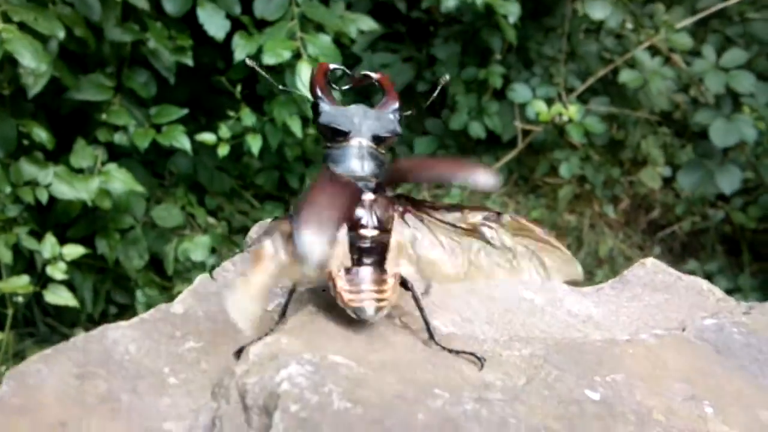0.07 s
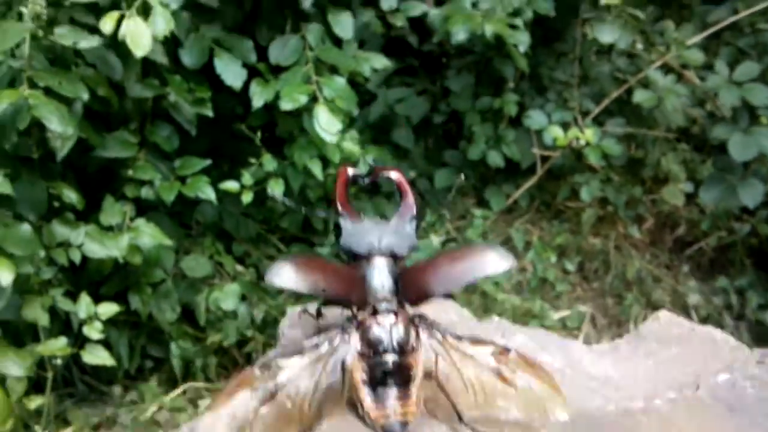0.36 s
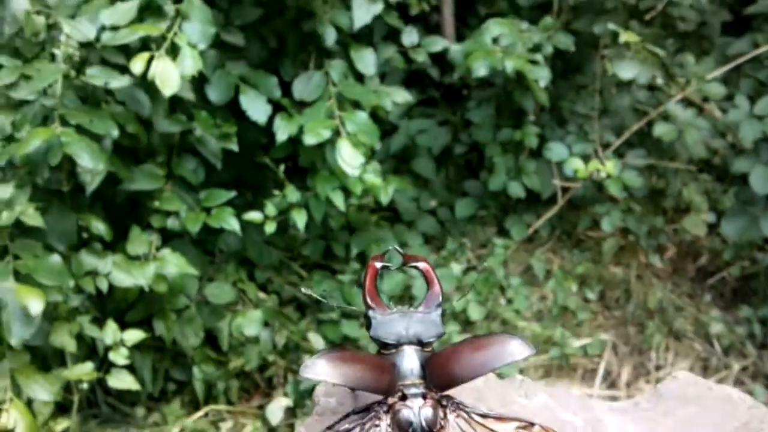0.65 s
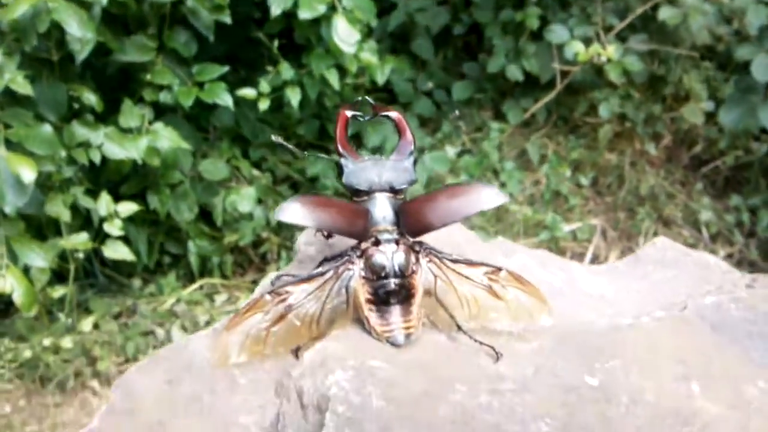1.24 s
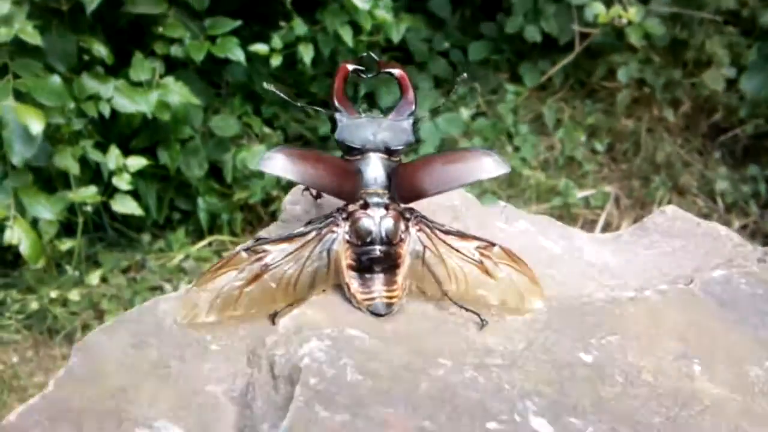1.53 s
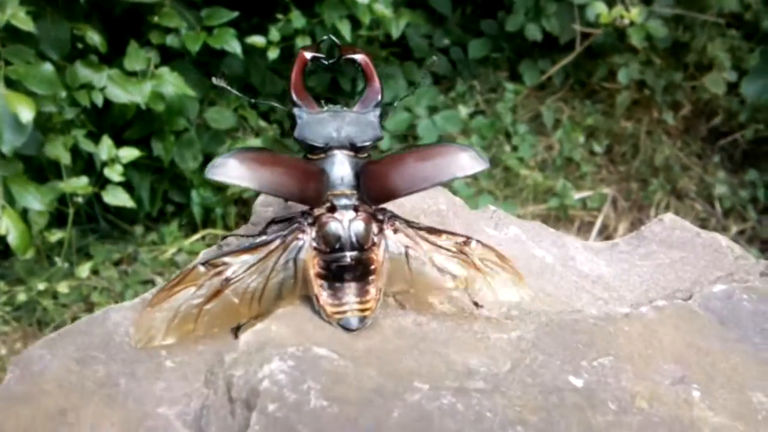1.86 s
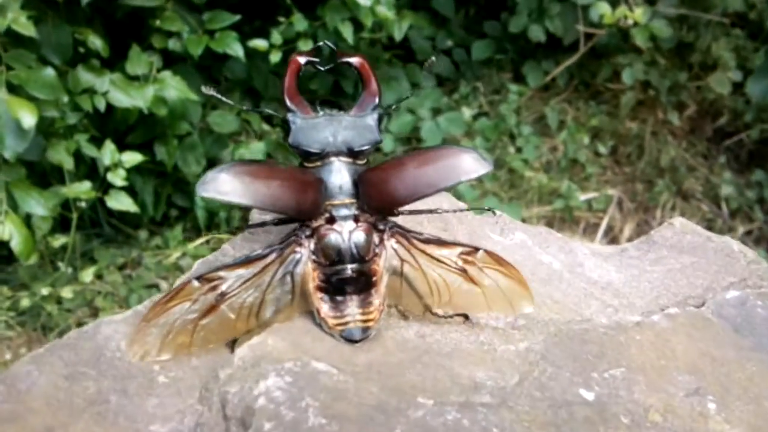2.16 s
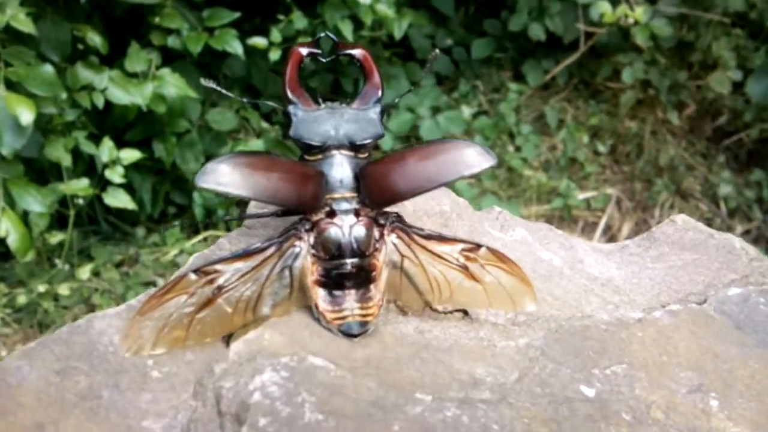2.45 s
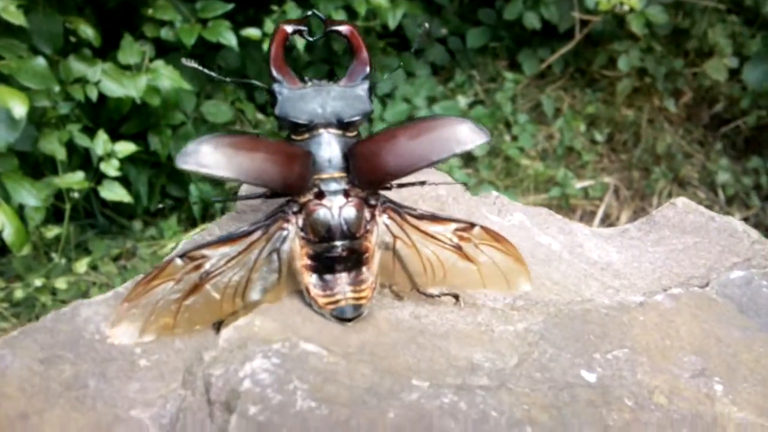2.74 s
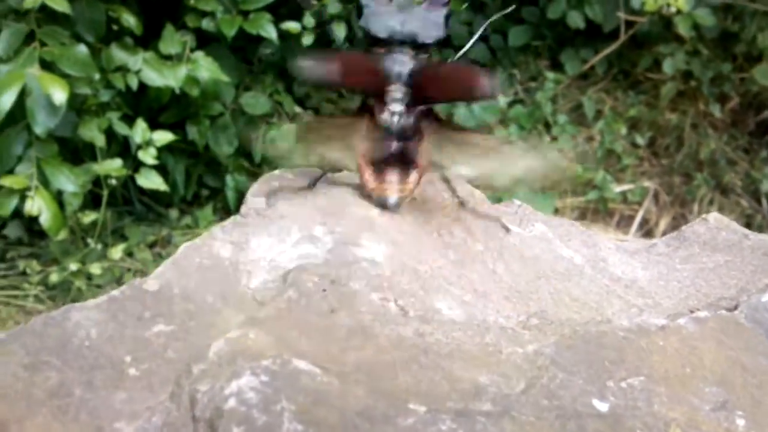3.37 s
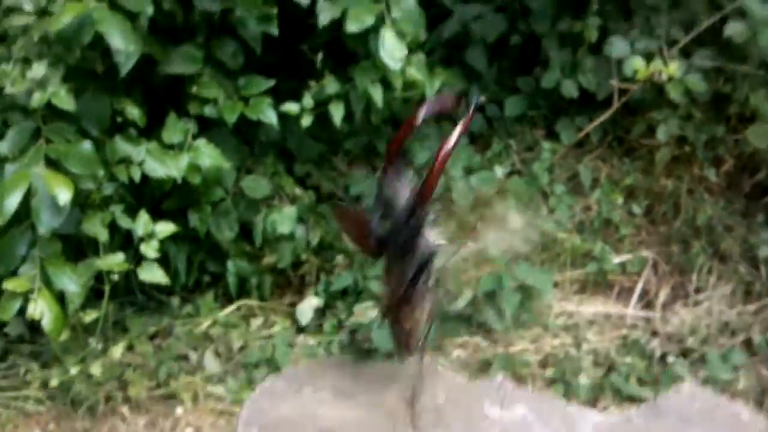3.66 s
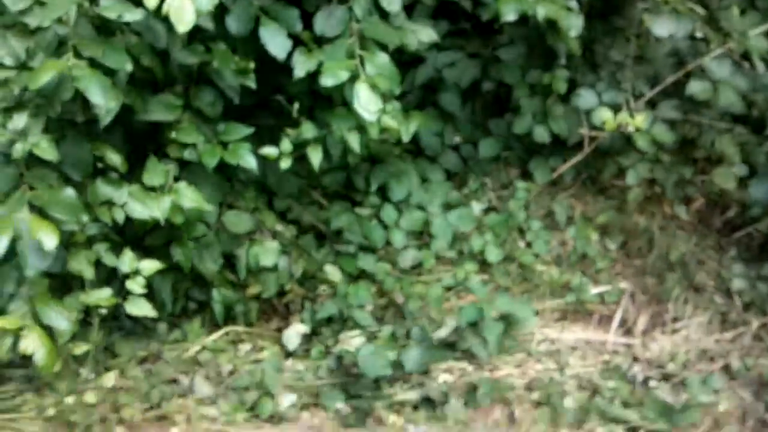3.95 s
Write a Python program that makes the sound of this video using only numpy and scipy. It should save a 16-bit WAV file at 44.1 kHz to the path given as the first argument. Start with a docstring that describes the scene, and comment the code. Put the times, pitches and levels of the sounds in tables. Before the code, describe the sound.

Low buzz and papery rattle of a beetle's wings, following quiet woodland with distant birds.

```python
"""A stag beetle takes off close by, its wings beating about 40 times a second.
Each stroke pushes air, giving a downwash and a hum; each reversal flicks the membrane.
The wings strike something as they start, and again as the beetle brushes past, with a papery rattle.
Before and behind the flight lies a quiet wood: a steady hush, distant birds and one soft knock."""
import sys
import numpy as np
from scipy import signal
from scipy.fft import rfft, irfft, next_fast_len
from scipy.io import wavfile
from scipy.ndimage import map_coordinates

SR = 44100
rng = np.random.default_rng(int(sys.argv[2]) if len(sys.argv) > 2 else 0)


def generate_wav(sig):
    """Save sig (samples, or channels by samples) to the path in sys.argv[1] as 16-bit PCM at SR."""
    pcm = np.round(np.clip(np.atleast_2d(sig).T, -1, 1) * 32767).astype(np.int16)
    wavfile.write(sys.argv[1], SR, pcm)


N = 176400
T = np.arange(N) / SR


def amp(db):
    """Amplitude ratio of a level in decibels."""
    return 10 ** (np.asarray(db) / 20)


def unit(x):
    """Normalisation to rms 1."""
    return x / np.sqrt(np.mean(x ** 2) + 1e-20)


def curves(rows):
    """Linear interpolation, at every sample, of each column after the time."""
    times, *columns = np.transpose(rows)
    return [np.interp(T, times, column) for column in columns]


def wobble(rate, size=N):
    """Smooth random modulation: a spline through rate Gaussian knots a second."""
    return map_coordinates(rng.standard_normal(int(size * rate / SR) + 4), [T[:size] * rate])


def filtered(x, response):
    """Linear filtering: the spectrum of x is multiplied by a frequency response."""
    size = next_fast_len(len(x) + 8192)
    return irfft(rfft(x, size) * response(np.fft.rfftfreq(size, 1 / SR)), size)[:len(x)]


def colour(points, hz):
    """Gain at hz, interpolated in log frequency between points (f/Hz, level/dB)."""
    f, db = np.transpose(points)
    return amp(np.interp(np.log(hz + 1), np.log(f + 1), db))


def noise(points):
    """Spectral shaping of white noise, to rms 1."""
    return unit(filtered(rng.standard_normal(N), lambda hz: colour(points, hz)))


def bump(turns, at, width):
    """A periodic Gaussian window, once per wingbeat; at and width are fractions of the beat."""
    return np.exp(-.5 * (((turns - at + .5) % 1 - .5) / width) ** 2)


def hush(level_db=-46, waver_db=0.7):
    """Ambient noise: the broadband hush of outdoor air, slightly modulated in level."""
    # spectrum of the air: f/Hz, relative level/dB
    air = [(15, -26), (25, 1), (170, -1.46), (450, -2), (1100, -5), (1700, -8.5), (2660, -10.3),
           (5430, -14), (7120, -17), (8880, -33), (11500, -68)]
    return amp(level_db + waver_db * wobble(6.09)) * noise(air)


def whistle(hz, rasp, swing_hz=420):
    """Frequency modulation: a bird's note follows a pitch track, shaken at random by its rasp."""
    pitch = hz + rasp * swing_hz * wobble(700, len(hz))
    return unit(signal.windows.tukey(len(hz), .5) * np.sin(2 * np.pi * np.cumsum(pitch) / SR))


def chirps(note_s=0.19, lead_s=0.0099, lisp_s=0.098, lisp_db=-1):
    """Band noise and a modulated tone: a small bird's high lisp lands on a fluttering note."""
    # chirps: t/s, landing f/Hz, level/dB
    calls = [(.16, 5350, -60), (0.489, 4350, -59.5), (.82, 4780, -60), (1.18, 5170, -61.5),
             (1.54, 4350, -59.5), (1.83, 4700, -60), (2.23, 5400, -58.5), (2.609, 5500, -60),
             (2.98, 4240, -58)]
    # spectrum of the lisp: f/Hz, relative level/dB
    lisp = [(4500, -25), (5600, 4.5), (6900, -0.5), (7800, -28.5)]
    out, hiss = np.zeros(N + SR), noise(lisp)
    swell = np.hanning(int(lisp_s * SR))
    for s, landing_hz, db in calls:
        span = slice(round(s * SR), round(s * SR) + len(swell))
        out[span] += amp(db + lisp_db) * unit(swell * hiss[span])
        note = whistle(np.full(int(note_s * SR), landing_hz), rasp=.48)
        out[round((s + lead_s) * SR):][:len(note)] += amp(db) * note
    return out[:N]


def pips(length_s=0.063):
    """Tone bursts: short bird calls, each wavering about one frequency."""
    # pips: t/s, f/Hz, level/dB
    calls = [(.355, 3990, -61), (.57, 4300, -56), (1.775, 3386, -56.5), (1.898, 4720, -56),
             (2.036, 2995, -52), (2.05, 3560, -57.5), (2.15, 3250, -57), (2.56, 2200, -56),
             (3.934, 2700, -55)]
    out = np.zeros(N + SR)
    for s, hz, db in calls:
        pip = whistle(np.full(int(length_s * SR), hz), rasp=0.18)
        out[round(s * SR):][:len(pip)] += amp(db) * pip
    return out[:N]


def knock(start_s=.7355, level_db=-30):
    """Damped free vibration: a light tap excites two modes that decay exponentially."""
    # modes: f/Hz, relative level/dB, T60/s
    modes = [(240, 1, 0.021), (1030, -10, 0.06)]
    t = np.maximum(T - start_s, 0)
    ring = sum(amp(db - 60 * t / t60) * np.cos(2 * np.pi * hz * t) for hz, db, t60 in modes)
    return amp(level_db) * (t > 0) * ring


def song():
    """Frequency glides: each note of a songbird follows a parabola through three pitches."""
    # notes: t/s, duration/s, first f/Hz, middle f/Hz, last f/Hz, level/dB, rasp (0-1)
    phrase = [(1.299, 0.24, 1715, 1610, 1820, -51.5, 0.04), (2.14, 0.15, 2070, 2170, 2150, -59.5, 0.07),
              (2.721, 0.17, 2950, 3600, 3850, -58.5, 0.67), (3.338, .3, 2777, 2056, 1890, -48.5, .17),
              (3.799, 0.151, 1850, 1882, 2004, -39, .27)]
    out = np.zeros(N + SR)
    for s, length, first, middle, last, db, rasp in phrase:
        progress = np.linspace(0, 1, int(length * SR))
        pitch = np.polyval(np.polyfit([0, .5, 1], [first, middle, last], 2), progress)
        out[round(s * SR):][:len(pitch)] += amp(db) * whistle(pitch, rasp)
    return out[:N]


def trill(start_s=1.592, length_s=.255, level_db=-48, fade_db=7.5, pulse_hz=54, fall_hz=420):
    """Biphonation: both sides of the syrinx pulse together, as the whole trill falls and fades."""
    progress = np.clip((T - start_s) / length_s, 0, 1)
    pulse = ((T - start_s) * pulse_hz + .15 * wobble(40)) % 1
    strands = np.zeros(N)
    for strand_hz in (2550, 2186):
        slide_hz = 326 * (.5 - pulse + .3 * wobble(200))  # each pulse slides down
        pitch = strand_hz - fall_hz * progress + slide_hz
        strands += np.sin(2 * np.pi * np.cumsum(pitch) / SR)
    envelope = amp(level_db - fade_db * progress) * ((progress > 0) & (progress < 1))
    return envelope * np.sqrt(2) * np.sin(np.pi * pulse) * strands


def among_trees(x, t60_s=0.48, wet=0.5):
    """Reverberation: trunks and leaves scatter part of a distant sound into a decaying tail."""
    tail = rng.standard_normal(SR) * amp(-60 * T[:SR] / t60_s)
    scattered = signal.fftconvolve(x, tail / np.linalg.norm(tail))[:N]
    return (x + wet * scattered) / np.hypot(1, wet)


def downwash(turns, level_db, gust_db=-36.5, growth=2.8, centre_hz=278):
    """Pulsating flow: air is pushed down once a beat, and turbulence grows steeply with its strength."""
    wash = unit(-np.sin(2 * np.pi * turns))
    band = lambda hz: (hz * centre_hz / (hz ** 2 + centre_hz ** 2)) ** 3
    gust = unit(filtered(rng.standard_normal(N), band))
    return amp(level_db) * wash + amp(gust_db + growth * (level_db - level_db.max())) * gust


def hum(turns, beat_hz, lead_turns=0.076, focus_db=8, width_hz=17.4):
    """Periodic loading: the strokes radiate harmonics of the beat, lifted in one moving band."""
    # harmonics from the second up: relative level/dB
    harmonics = [1.5, -7, -5, -8.5, -7.5, -12.5]
    # the band's centre as the beetle rises and passes: t/s, f/Hz
    focus = [(3.35, 203), (3.43, 161), (3.68, 159), (3.8, 124), (3.93, 175)]
    focus_hz, = curves(focus)
    tone = np.zeros(N)
    for k, db in enumerate(harmonics, 2):
        lift_db = focus_db * np.exp(-.5 * ((k * beat_hz - focus_hz) / width_hz) ** 2)
        tone += amp(db + lift_db) * np.cos(2 * np.pi * k * (turns + lead_turns))
    return unit(tone)


def flick(turns, beat_hz, wing_offset_turns=0.0604, swish_db=-3, snap_db=-4.5):
    """Impulsive excitation: both reversals swish, and at the first each membrane snaps taut and rings."""
    # spectrum of the swish: f/Hz, relative level/dB
    swish = [(250, -17), (700, -3.5), (1500, 2), (2600, -5.5), (7300, -15), (9000, -40)]
    # membrane modes: f/Hz, relative level/dB, T60/s
    modes = [(433, -3.5, 0.022), (853, -1, 0.0082), (1430, 1.5, 0.0037)]
    first_reversal = bump(turns, at=0, width=.032) + .2 * bump(turns, at=0, width=.11)
    second_reversal = .52 * bump(turns, at=0.435, width=.045)
    swishes = unit((first_reversal + second_reversal) * noise(swish))
    since_s = np.array([turns % 1, (turns + wing_offset_turns) % 1]) / beat_hz  # one row per wing
    rings = sum(amp(db - 60 * since_s / t60) * np.sin(2 * np.pi * hz * since_s) for hz, db, t60 in modes)
    return amp(swish_db) * swishes - amp(snap_db) * unit(rings.sum(0))


def rustle(flicker_db=3.7):
    """Random amplitude modulation: the membrane rustles as flickering broadband noise."""
    # spectrum of the rustle: f/Hz, relative level/dB
    spectrum = [(200, -5), (6800, -8.5), (9000, -24)]
    return unit(amp(flicker_db * wobble(300)) * noise(spectrum))


def wings(start_s=3.21, rise_s=0.006, reversal_s=3.4494, scatter_db=.6):
    """Flapping flight: one wingbeat phase drives downwash, hum and flick, over the membrane's rustle."""
    # wingbeat rate: t/s, f/Hz
    beat = [(3.2, 43.5), (3.3, 41.3), (3.45, 40), (3.6, 39.1), (3.7, 39.8), (3.8, 43.5), (3.88, 41),
            (4, 38.6)]
    # course of the flight: t/s, then relative level/dB of downwash, hum, flick and rustle
    flight = [(3.22, -38, -42, -42, -43), (3.265, -36, -39.5, -40, -35.5), (3.33, -39, -40.5, -40.5, -37),
              (3.41, -37.5, -37.5, -39.5, -39), (3.49, -45, -35, -34.5, -48), (3.6, -47, -36.5, -35.5, -47),
              (3.68, -44, -38.5, -34.5, -44.5), (3.75, -56, -36, -38, -44.5), (3.815, -63, -40, -54, -36),
              (3.84, -60, -43, -54, -31), (3.9, -57, -44, -42.5, -38), (3.96, -50, -42.5, -44.5, -48)]
    beat_hz, = curves(beat)
    wash_db, hum_db, flick_db, rustle_db = curves(flight)
    turns = np.cumsum(beat_hz) / SR
    turns -= np.interp(reversal_s, T, turns)  # whole turns fall on the first reversal of each beat
    membrane = amp(flick_db) * flick(turns, beat_hz) + amp(rustle_db) * rustle()
    airflow = downwash(turns, wash_db) + amp(hum_db) * hum(turns, beat_hz)
    effort = np.clip((T - start_s) / rise_s, 0, 1) * amp(scatter_db * wobble(60))
    return effort * (airflow + membrane)


def strikes(gain_db=-3.5, bright_db=5, octaves=.45, attack_s=.0005, release_s=.0013, rasp_db=1.8):
    """Friction noise: a wing scrapes an obstacle for a few milliseconds, with a dry, bright crackle."""
    # wing contacts: t/s, relative level/dB, duration/s, emphasised f/Hz
    contacts = [(3.213, -28.5, 0.0042, 4400), (3.2375, -21.5, 0.0025, 2500), (3.259, -20, 0.0043, 4000),
                (3.284, -22.5, 0.0033, 3500), (3.69, -31.5, 0.015, 6000), (3.7235, -22.5, 0.0061, 3700),
                (3.745, -26, 0.011, 7100), (3.7706, -18.5, 0.0061, 6600), (3.7938, -12.5, 0.0039, 6160),
                (3.8163, -13, 0.0037, 4500), (3.8308, -16.5, 0.0018, 6000), (3.84, -10.5, 0.0011, 6060),
                (3.8636, -20.5, 0.0074, 2840), (3.8888, -26.5, 0.0065, 2980), (3.913, -25, 0.0078, 3160),
                (3.937, -28, 0.0056, 4560)]
    # spectrum of a contact: f/Hz, relative level/dB
    spectrum = [(200, -14), (600, -2.5), (1400, 2), (7400, -2), (9000, -17.5)]
    out, t = np.zeros(N + SR), T[:SR // 20]
    for s, db, length, peak_hz in contacts:
        emphasis = lambda hz: amp(bright_db * np.exp(-.5 * (np.log2((hz + 1) / peak_hz) / octaves) ** 2))
        envelope = (1 - np.exp(-t / attack_s)) * np.exp(-np.maximum(t - length, 0) / release_s)
        catches = amp(rasp_db * wobble(1400, len(t)))
        scrape = filtered(rng.standard_normal(len(t)), lambda hz: colour(spectrum, hz) * emphasis(hz))
        out[round(s * SR):][:len(t)] += amp(db + gain_db) * envelope * unit(catches * scrape)
    return out[:N]


def scene():
    """Superposition: the beetle close by, the wood behind it."""
    beetle = wings() + strikes()
    birds = among_trees(song() + pips() + chirps() + trill())
    return (beetle + birds + knock() + hush())[None]


def record(dry, limit_hz=9000):
    """Low-pass filtering: the top of the treble rolls off, then ends at a steep band limit."""
    roll_off = [(7400, -0.5), (8700, -7), (9100, -24.5)]  # f/Hz, gain/dB
    return filtered(dry[0], lambda hz: colour(roll_off, hz) / (1 + (hz / limit_hz) ** 120))[None]


dry = scene()
out = record(dry)
generate_wav(out)
```